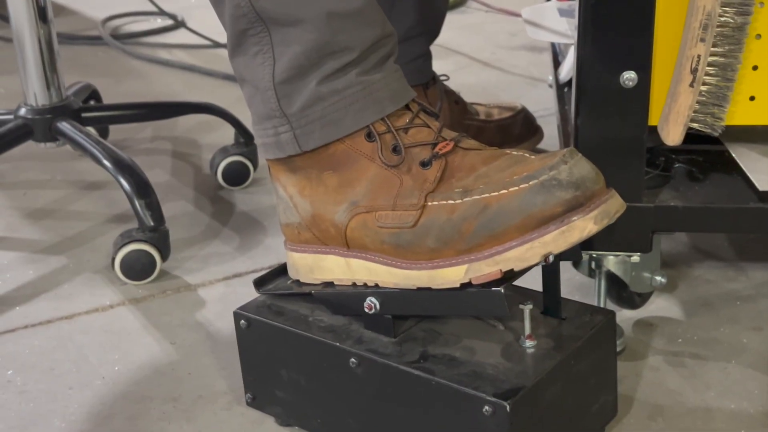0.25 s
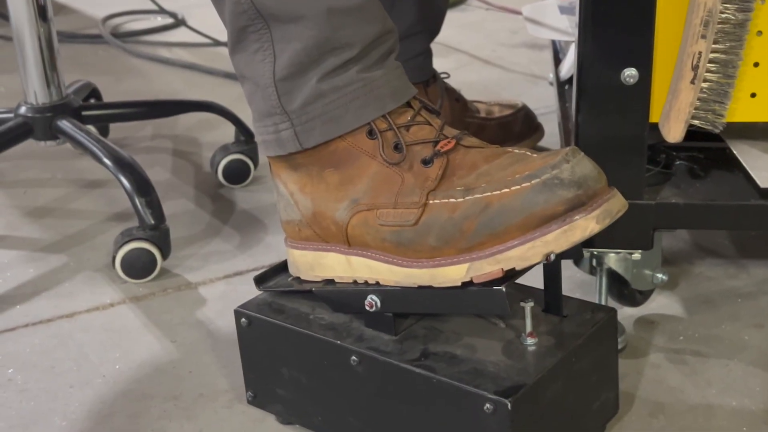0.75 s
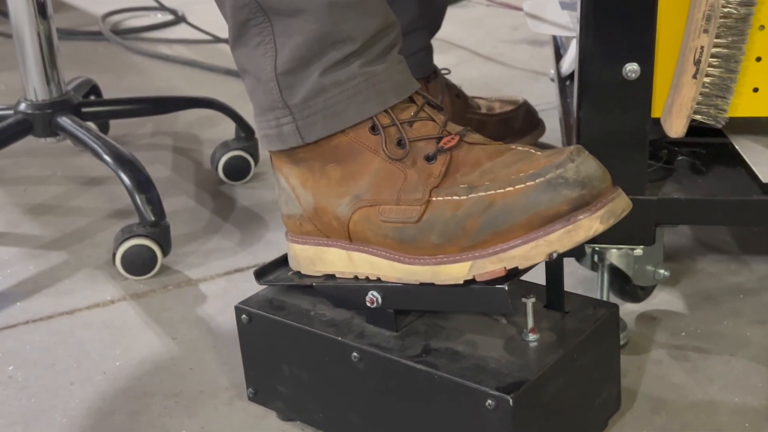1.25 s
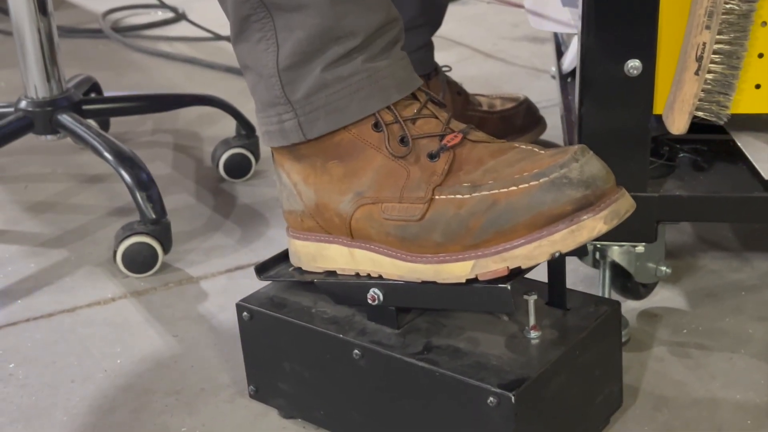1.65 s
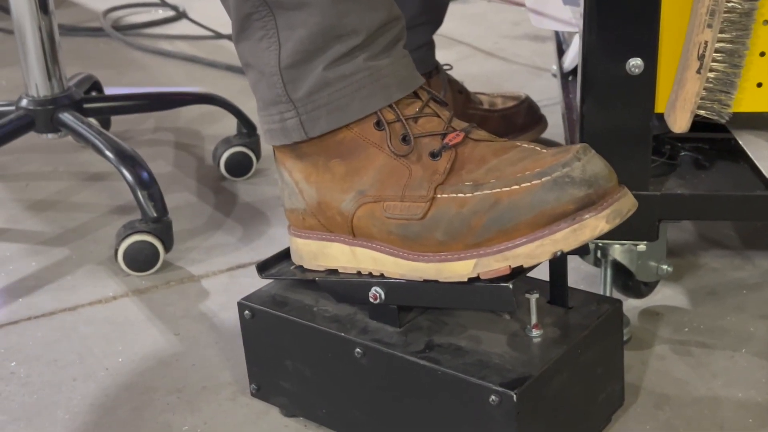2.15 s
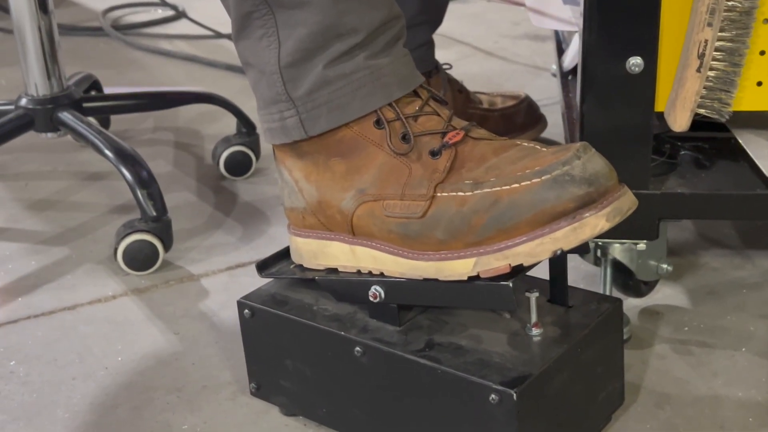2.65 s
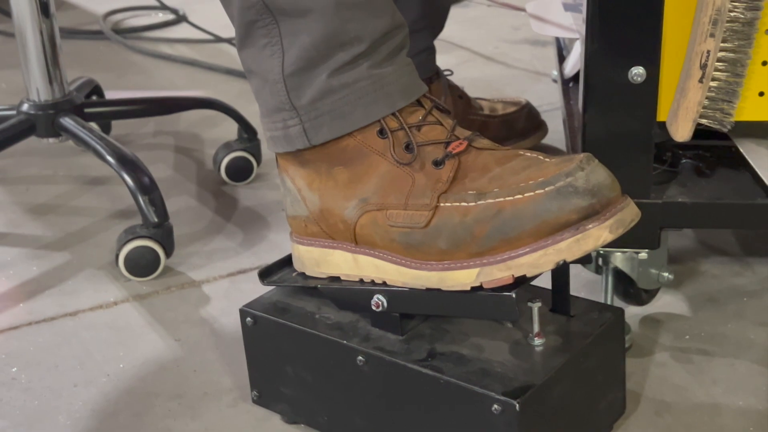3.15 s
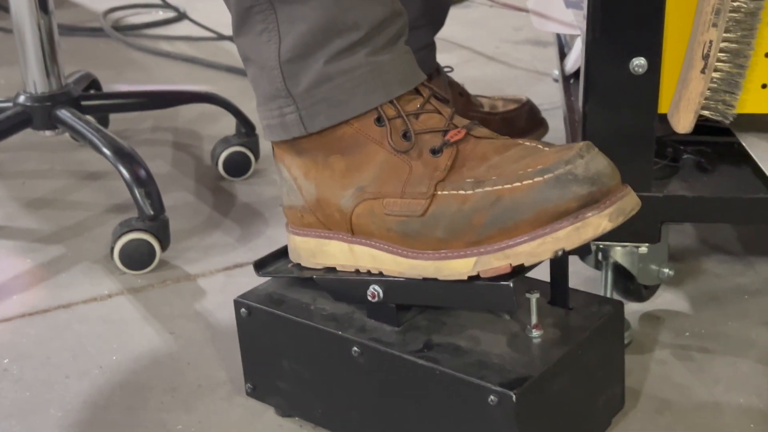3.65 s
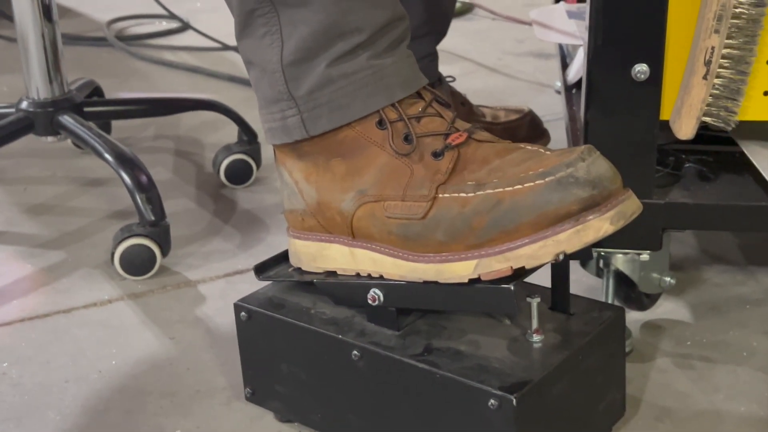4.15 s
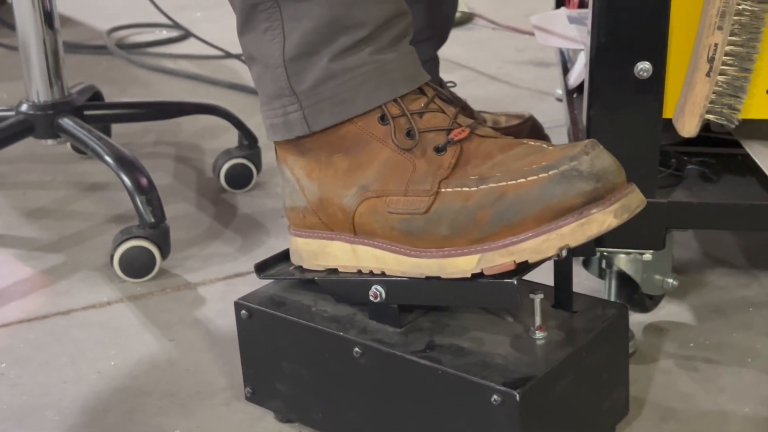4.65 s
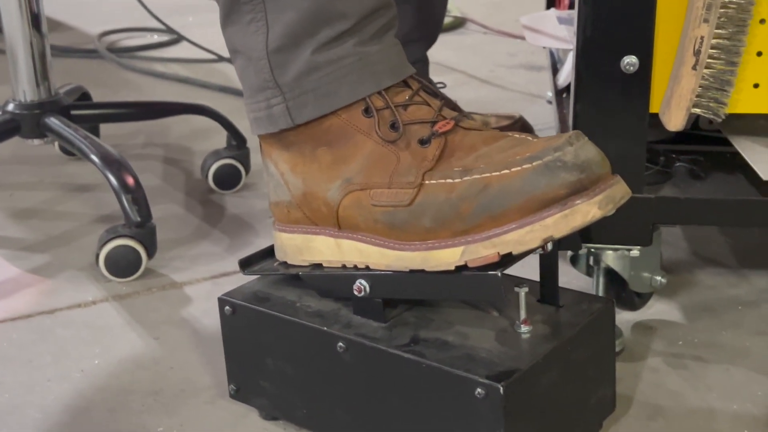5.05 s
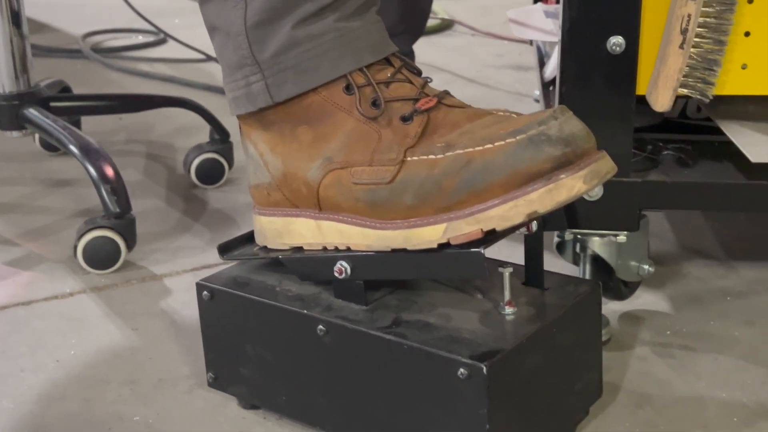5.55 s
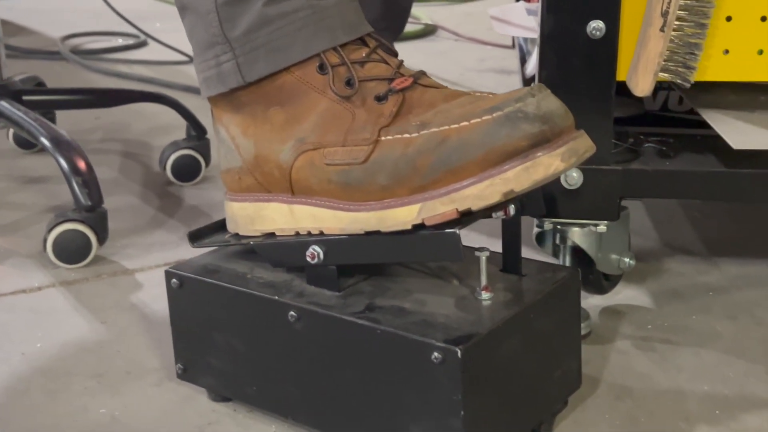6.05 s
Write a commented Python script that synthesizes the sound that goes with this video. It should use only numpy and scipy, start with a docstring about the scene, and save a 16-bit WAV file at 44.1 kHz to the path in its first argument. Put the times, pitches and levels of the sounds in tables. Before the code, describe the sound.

A cooling fan rushes, then a welding arc stutters with loud pops and fizzing sparks before holding as a harsh, slowly shifting electric buzz.

```python
"""An AC TIG arc buzzes in a workshop, ridden on a foot pedal, beside the welder's cooling fan.
Fizzing starter sparks and loud pops come in stuttering runs until the arc holds. In each of 115 cycles a second
one polarity reversal snaps the air and the other snaps more softly. The same current steps ring the machine:
a whine whose overtones and narrow panel resonances swell and fade as the pedal lengthens the current ramp.
The fan is wavering tones over filtered noise; short bounces and diffuse echoes place the arc in the room."""
import sys
import numpy as np
from scipy import signal
from scipy.fft import rfft, irfft
from scipy.io import wavfile
from scipy.ndimage import uniform_filter1d

SR = 44100
rng = np.random.default_rng(int(sys.argv[2]) if len(sys.argv) > 2 else 0)


def persist_wave(psi):
    """Save psi, clipped to +-1, as 16-bit WAV."""
    counts = np.round(np.clip(psi, -1, 1) * 32767).astype(np.int16)
    wavfile.write(sys.argv[1], SR, np.atleast_2d(counts).T)


N = 278271
T = np.arange(N) / SR

AC_HZ = 114.995
STRIKE_S, HOLD_S = 0.444, 1.605  # the metal warms from the first spark until the arc holds
# ramp length at rest [ms]; the whine's shifting overtones count from it too
RAMP_MS = 0.98

# pops as the arc drops out and catches again:
# (time [s], level before colouring [dB], crack relative to body [dB])
POP_EVENTS = [(0.4455, 2.5, -37), (0.4775, 1.5, -27), (0.5303, 3, -22), (0.5476, 2, -19), (0.5964, 0.5, -1),
              (0.6138, -1.5, 4), (0.6312, -4, 3), (0.6486, -0.5, 3), (0.6660, -2.5, 2), (0.6834, -2.5, -2),
              (0.7006, 1, -5), (0.736, -0.5, 3.5), (0.7528, 1, -1), (0.7707, -5, -9), (0.7909, 3, -16),
              (0.8390, -2, 4), (0.8564, 0.5, 2.5), (0.8738, -2, 6), (0.8911, -2.5, -3), (0.9083, 1.5, -12),
              (0.9426, 2.5, -13), (0.9769, 2, -14), (0.9942, 2.5, -13), (1.0289, 3, -17),
              (1.0463, 2.5, -19), (1.1260, 2.5, -16), (1.1436, -1.5, 1.5), (1.1610, 1, 1.5),
              (1.1956, 1.5, -10), (1.2455, 4, -22), (1.263, 1, -5), (1.3164, 3.5, -27), (1.3338, 2, -16),
              (1.4321, 3, 1), (1.45, 3, -25), (1.518, -1.5, -2), (1.5870, 4, -19)]
# hard starter sparks, after which the current surges:
# (time [s], spark level before colouring [dB], surge [dB])
HARD_SPARKS = [(0.4457, -27.5, 7), (0.681, -21, 5.5), (0.766, -21, 0), (0.889, -35, 9.5), (1.143, -31, 7),
               (1.431, -26, 1.5), (1.516, -23, 6)]


def undb(db):
    """Decibels to gain."""
    return 10 ** (np.asarray(db) / 20)


def unit(x):
    """Scale to rms 1."""
    return x / np.sqrt(np.mean(x ** 2))


def curve(rows):
    """Join (time [s], value) rows by straight lines."""
    return np.interp(T, *np.transpose(rows))


def colour(x, points):
    """Causal minimum-phase filter through (frequency [Hz], gain [dB]) points."""
    size = 2 ** 19
    f = np.arange(size // 2 + 1) * SR / size
    hz, db = np.transpose(points)
    gain = undb(np.interp(np.log(f + 1), np.log(hz), db))
    # folding the cepstrum onto positive time makes the filter causal
    cepstrum = irfft(np.log(gain))
    cepstrum[1:size // 2] *= 2
    cepstrum[size // 2 + 1:] = 0
    response = np.exp(rfft(cepstrum))
    return irfft(rfft(x, size) * response)[..., :N]


def walk(rate):
    """Random levels held 1 / rate s and slewed twice, at rms 1."""
    hold = int(SR / rate)
    steps = np.repeat(rng.standard_normal(N // hold + 1), hold)
    slewed = uniform_filter1d(uniform_filter1d(steps, hold), hold)
    return unit(slewed[:N])


def clicks(times, sizes):
    """Impulses placed between samples by a windowed sinc."""
    at = times[:, None] * SR
    taps = np.floor(at).astype(int) + np.arange(-7, 9)
    shape = np.sinc(taps - at) * np.sinc((taps - at) / 8)
    # whatever falls beyond the end lands in a spare bin, cut off here
    bins = np.clip(taps, 0, N).ravel()
    return np.bincount(bins, (shape * sizes[:, None]).ravel(), N + 1)[:N]


def delayed(x, ms):
    """The same sound a little later."""
    return np.interp(T - ms / 1000, T, x, left=0)


def workshop(x, t60, early_s, early_db, width_db):
    """Diffuse echoes: a quick scatter off nearby gear, then the hall's tail; width is side over mid."""
    t = T[:SR]
    tail = undb(-60 * t / t60)
    envelope = tail + undb(early_db) * np.exp(-t / early_s)
    echo = rng.standard_normal((2, SR))
    for _ in range(8):
        # a large hall smears time but favours no pitch: flatten the spectrum, then the level over time
        spectrum = rfft(envelope * echo)
        echo = irfft(spectrum / np.abs(spectrum), SR)
        echo = echo / np.sqrt(uniform_filter1d(echo ** 2, size=256) + 1e-14)
    impulse = echo * envelope / np.linalg.norm(envelope)
    mid, side = signal.fftconvolve(x[None], impulse, axes=1)[:, :N]
    return mid + undb(width_db) * side * np.array([[1], [-1]])


def near(x, lag_ms, pan_db):
    """The direct path, nearly straight ahead, and its first bounces, stronger on the right."""
    # floor and bench reflections: (delay [ms], left gain [ratio], right gain [ratio])
    bounces = [(2.29, 0.1, -0.73), (11.1, -0.014, 0.47)]
    reflected = sum(np.array([[left], [right]]) * delayed(x, ms) for ms, left, right in bounces)
    left, right = x + reflected
    return np.array([left * undb(pan_db / 2), delayed(right, lag_ms) * undb(-pan_db / 2)])


def cold(t=T):
    """1 at the strike, falling to 0 once the metal is hot."""
    return np.interp(t, [STRIKE_S, HOLD_S], [1, 0])


def ramp_ms(t=T):
    """The pedal, eased back ever faster, lengthens the time the current takes to ramp after a reversal."""
    pedal_s, growth_ms, power = 2.5, 0.205, 1.5
    return RAMP_MS + growth_ms * np.maximum(t - pedal_s, 0) ** power


def current_db():
    """Current-driven level: raised on cold metal, sagging at each dropout, surging after a hard spark."""
    cold_db, surge_s = 3, 0.012  # a surge peaks surge_s after its spark
    dropout_db, dropout_s, lead_s = -6, 0.016, 0.019  # each sag is deepest lead_s before its pop
    sag = sum(np.exp(-((T - s + lead_s) / dropout_s) ** 2) for s, _, _ in POP_EVENTS)
    db = cold_db * cold() + dropout_db * np.minimum(sag, 1)
    for s, _, surge_db in HARD_SPARKS:
        age = np.maximum(T - s, 0) / surge_s
        db = db + surge_db * age * np.exp(1 - age)
    return db


def reversals(offset_ms, ramp_share, scatter_db, second, drift_ms=0.023):
    """Two current steps each AC cycle; they stray apart while the arc is cold and move as a pair once hot."""
    cleaning_ms = 1.754  # time between a cycle's two reversals, while the electrode is positive
    cold_wander_ms, hot_wander_ms = 0.7, 0.006  # timing scatter
    cold_scatter_db = 6  # on cold metal the steps are more uneven, and weaker on average
    times = np.arange(np.ceil(STRIKE_S * AC_HZ), N / SR * AC_HZ) / AC_HZ
    chance = rng.standard_normal((len(times), 6)).T
    wander_ms = cold_wander_ms * cold(times) ** 1.4 * chance[:2] + hot_wander_ms * chance[4]
    late_ms = offset_ms + ramp_share * ramp_ms(times) + wander_ms
    # the hand-held arc length drifts, and the steps with it
    late_ms = late_ms + drift_ms * np.interp(times, T, walk(3.19))
    sizes = undb(scatter_db * chance[5] + cold_scatter_db * cold(times) * (chance[2:4] - 1))
    first_steps = clicks(times + late_ms[0] / 1000, sizes[0])
    second_steps = clicks(times + (late_ms[1] + cleaning_ms) / 1000, sizes[1])
    return first_steps + second * second_steps


def fan():
    """Wavering fan and motor tones over a noise rush of cooling air, alike in both ears in the bass."""
    # spectrum of the air rush: (frequency [Hz], relative density [dB per Hz])
    air_spectrum = [(20, -4), (35, -10), (65, 2), (95, -1), (135, 5), (200, -0.5), (260, -5), (330, -6),
                    (420, -13.5), (700, -16.5), (1200, -18), (2600, -21), (4600, -30.5), (7600, -28),
                    (10000, -48), (16000, -49)]
    # likeness of the two ears: (frequency [Hz], side minus mid [dB])
    side_spectrum = [(30, -13), (60, -19), (125, -15.5), (250, -7), (500, -4.5), (1000, 4), (16000, -3)]
    # fan and motor tones: (frequency [Hz], level before balance [dB], wavering share [ratio])
    fan_tones = [(133.2, -49, 0.79), (187.4, -43.5, 0.26), (234.6, -37.5, 0.12), (266.7, -48.5, 4.4),
                 (472.8, -54, 6.7), (707.3, -52.5, 7.5)]
    mid, side = colour(rng.standard_normal((2, N)), air_spectrum)
    side = colour(side, side_spectrum)
    stereo_air = unit(np.array([mid + side, mid - side]))
    air = undb(-38.0) * stereo_air * undb(.5 * walk(5.0))
    tones = 0
    for hz, db, waver in fan_tones:
        # turbulence smears the higher tones more widely
        swing = 1 + waver * (walk(hz / 10) + 1j * walk(hz / 10))
        # the left ear's phase runs 0.4 ms ahead
        turn = 2 * np.pi * hz * (T + np.array([[.0004], [0]]))
        tones = tones + undb(db) * unit(np.real(swing * np.exp(1j * turn)))
    return air + tones * undb(np.array([[.6], [-.6]]))


def panels(x):
    """Metalwork resonances build as the arc settles, then swell or dip as the current ramp changes."""
    # narrow bands: (frequency [Hz], width [Hz], lift [dB], best ramp [ms], ramp tolerance [ms])
    resonances = [(1370, 72, 12, 2.2, 0.38), (1636, 17, 10, 0.79, 0.33), (1880, 40, 10, 1.84, 0.68),
                  (2082, 42, 6, 1.11, 0.17), (2152, 32, 13.5, 1.02, 0.38), (2170, 71, -28, 1.9, 0.18),
                  (2440, 36, 6.5, 1.56, 0.95), (2555, 54, 10.5, 2.3, 0.96), (2780, 59, 5, 1.27, 0.38),
                  (2900, 57, 4, 1.06, 0.21), (2940, 46, -17, 1.9, 0.23), (3450, 60, 3.5, 1.72, .12),
                  (3335, 60, 6, 1.34, 0.14), (3920, 105, 8, 2.28, .28), (4560, 25, 14.5, 1.2, 0.83),
                  (4485, 47, 12, 2.48, 0.3), (4600, 64, 8, 2.12, .28), (5040, 45, 7, 1.26, 0.099),
                  (5110, 130, 10.5, 1.92, 0.12), (5520, 220, 1.5, 1, 0.2), (5750, 50, 4, 2.2, 0.17),
                  (6190, 46, 14, 1.57, 0.15), (6100, 44, 2, 2.06, .2), (6290, 28, 13.5, 0.986, 0.21),
                  (6440, 50, 10.5, 2.23, 0.083), (6980, 50, -1, 1.37, 0.23), (6785, 50, 6, 2.1, 0.24),
                  (6900, 46, 8.5, 1.69, 0.52), (7015, 45, 8, 0.97, 0.13), (7360, 45, -5, 0.9, 0.15),
                  (7475, 55, 12, 1.55, 0.078), (7550, 45, 1, 1.4, 0.27), (8120, 120, 2.5, 1.04, .15),
                  (8020, 150, 7, 1.58, 0.43), (7935, 50, 1.5, 1.85, 0.052), (8050, 55, 2, 2.4, 0.25),
                  (8620, 200, 9.5, 2.07, 0.89), (2400, 82, -5.5, 2.3, 0.33), (3380, 200, -12, 2.3, .12),
                  (1450, 150, -14, 1.3, 0.1), (7400, 430, -10, 1.2, 0.036), (6080, 130, -6, 1.21, .05),
                  (3740, 510, -4.5, 1.13, 0.23)]
    settle_from_s, settle_s = 0.91, 0.89
    ramp = ramp_ms()
    settled = np.clip((T - settle_from_s) / settle_s, 0, 1)
    for hz, width, lift_db, best_ms, tolerance_ms in resonances:
        suited = settled * np.exp(-((ramp - best_ms) / tolerance_ms) ** 2)
        band = signal.lfilter(*signal.iirpeak(hz, hz / width, SR), x)
        x = x + (undb(lift_db * suited) - 1) * band
    return x


def whine(count=7):
    """The current steps ring the machine; as the pedal moves, each overtone swells and fades on its own."""
    # whine of the welding current: (time [s], level before gain and current changes [dB])
    whine_level = [(0.445, -39.5), (0.58, -38), (0.61, -33.5), (1.35, -32), (1.56, -33.5), (1.65, -34),
                   (1.97, -33), (2.24, -34.5), (2.46, -33.5), (2.8, -35), (3.33, -33), (3.97, -35),
                   (4.49, -35), (4.94, -34), (6.25, -32)]
    # ring of the machine: (frequency [Hz], relative gain [dB])
    ring_colour = [(500, -40.5), (1200, -9), (1700, -3.5), (3300, -1.5), (3900, -5), (4300, -3.5),
                   (5100, 0), (6300, 4.5), (7000, 1.5), (8100, 0), (8700, -7), (9100, -6), (9500, -39.5),
                   (11500, -1.5), (13000, -12.5), (14500, -5.5), (16000, -20)]
    gain_db, flicker_db = -2, 0.34  # the level flickers slightly
    shift_share, shift_step_ms = 0.47, 0.24  # part of the whine scatters anew per step of ramp growth
    steps = reversals(4.6, 0, scatter_db=1.0, second=1)
    db = curve(whine_level) + gain_db + current_db() + flicker_db * walk(8)
    dry = unit(colour(steps, ring_colour)) * undb(db)

    def scatter(x):
        """A fresh random scatter of the ringing on every call."""
        return workshop(x, t60=0.42, early_s=0.0164, early_db=12.5, width_db=0.5)

    travel = (ramp_ms() - RAMP_MS) / shift_step_ms
    shifting = 0
    for k in range(count):
        # crossfade from one scatter to the next
        fade = np.cos(np.pi / 2 * np.clip(travel - k, -1, 1))
        shifting = shifting + scatter(dry * fade)
    return (scatter(dry) + shift_share * shifting) * undb(np.array([[.5], [-.5]]))


def strikes(spark_db=-1, spark_s=0.0015, catch_s=0.0012, split_hz=2000):
    """A starter spark fizzes, then gas flashes hot: a pop falling in pitch; faster flashes crack higher."""
    # body and crack of the pops: (frequency [Hz], gain [dB])
    pop_colour = [(150, -31), (380, -3.5), (500, 5), (680, 6.5), (900, 6.5), (1130, 9), (1550, 6.5),
                  (2050, 8), (2850, 6.5), (3300, 4.5), (3700, -3), (5000, -4), (7000, -31), (16000, -30)]
    # fizz of the sparks: (frequency [Hz], gain [dB])
    fizz_colour = [(500, -2), (4000, 3.5), (7000, 1.5), (9500, -6), (12000, 7.5), (16000, 2)]
    ordinary_db, cold_change_db = -21.5, -12  # the spark before each pop, and its change on cold metal
    trail_hz = 730  # a pop's low end trails its crack around this pitch
    s, db, crack_db = np.transpose(POP_EVENTS)
    hard_s, hard_db, _ = np.transpose(HARD_SPARKS)
    low = signal.butter(2, split_hz, fs=SR, output="sos")
    body = signal.sosfiltfilt(low, clicks(s, undb(db)))
    crack = clicks(s, undb(db + crack_db))
    flashes = body + crack - signal.sosfiltfilt(low, crack)
    # taking a resonance away twice leaves an all-pass, which only delays
    flashes = flashes - 2 * signal.lfilter(*signal.iirpeak(trail_hz, 1, SR), flashes)
    ordinary = clicks(s - catch_s, undb(ordinary_db + cold_change_db * cold(s)))
    starter = ordinary + clicks(hard_s, undb(hard_db))
    age = T[:SR // 40] / spark_s
    envelope = signal.fftconvolve(starter, 2 * age * np.exp(-age))[:N]
    sparks = undb(spark_db) * envelope * rng.standard_normal(N)
    dry = colour(flashes, pop_colour) + colour(sparks, fizz_colour)
    room = workshop(delayed(dry, 3), t60=0.5, early_s=0.009, early_db=9.5, width_db=-0.5)
    return undb(0.5) * near(dry, lag_ms=0.018, pan_db=-1.0) + undb(-4.0) * room


def arc():
    """The arc relights with a snap at one reversal and more softly at the other."""
    # snap of the burning arc: (time [s], level before gain [dB])
    snap_level = [(1.6, -32), (1.75, -33), (2.91, -35.5), (3.77, -36.5), (4.13, -38.5), (5.5, -38),
                  (6.25, -41.5)]
    # tone of the snap: (frequency [Hz], relative gain [dB])
    snap_colour = [(200, -18), (700, -15), (900, -7.5), (1040, -3), (1150, 1.5), (1270, -0.5), (1400, -9),
                   (1700, -2), (2150, 3), (2550, -2.5), (2900, 0.5), (3300, -3.5), (4000, -16.5),
                   (8000, -26), (16000, -28)]
    gain_db, stutter_db = -4, -9  # gain of the snap, and its change before the arc holds
    snaps = reversals(6.25, 0.019, scatter_db=1.7, second=0.15)
    db = curve(snap_level) + gain_db + stutter_db * (T < HOLD_S)
    dry = unit(colour(snaps, snap_colour)) * undb(db)
    direct = near(dry, lag_ms=0, pan_db=1)
    room = undb(-12) * workshop(dry, t60=.45, early_s=.012, early_db=5, width_db=-2)
    return direct + room


def scene():
    """The fan runs throughout; the arc stutters, then holds."""
    return fan() + strikes() + panels(arc() + whine())


def record(dry):
    """A steep elliptic low-pass cuts the top above 16 kHz."""
    return signal.sosfilt(signal.ellip(8, .2, 70, 16000, fs=SR, output="sos"), dry)


dry = scene()
out = record(dry)
persist_wave(out)
```